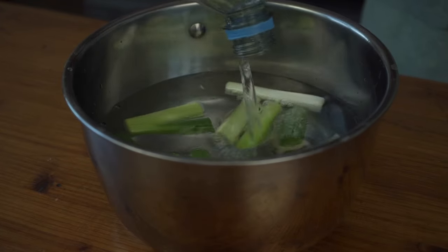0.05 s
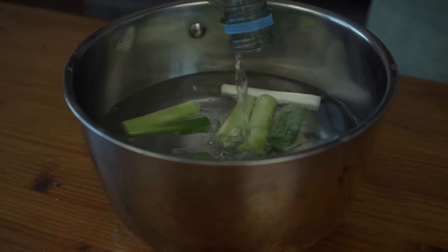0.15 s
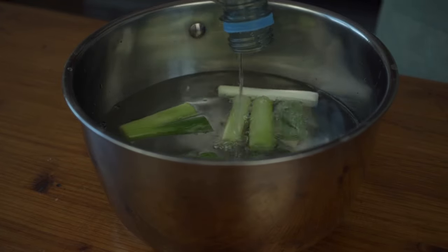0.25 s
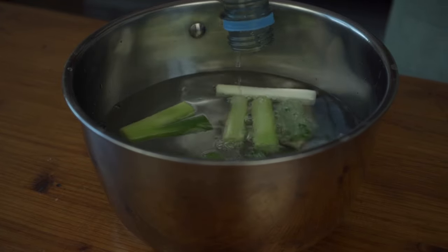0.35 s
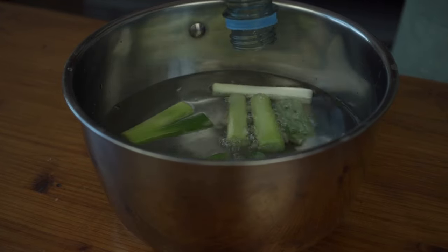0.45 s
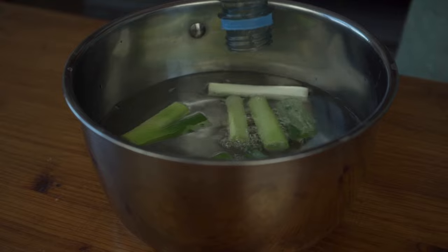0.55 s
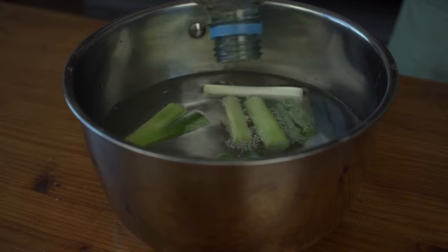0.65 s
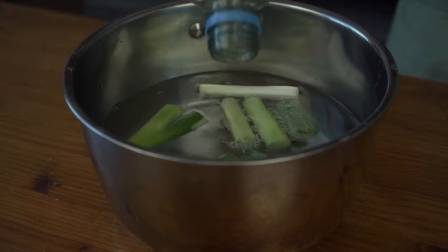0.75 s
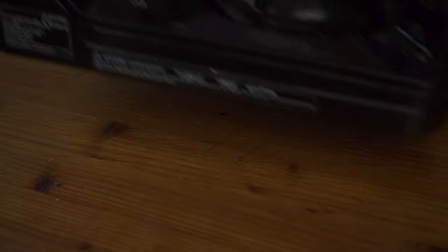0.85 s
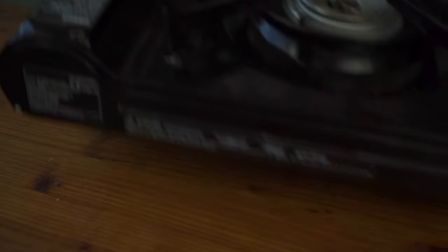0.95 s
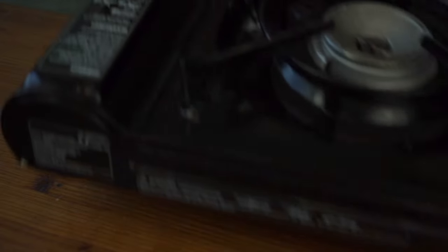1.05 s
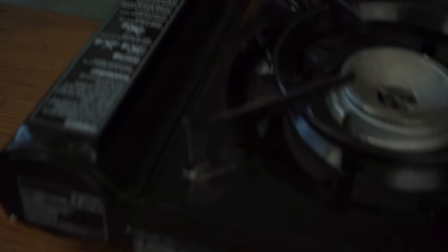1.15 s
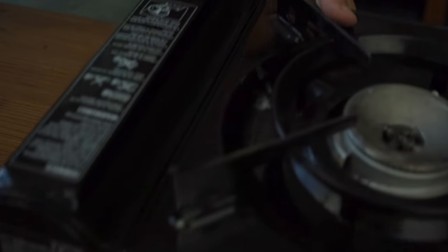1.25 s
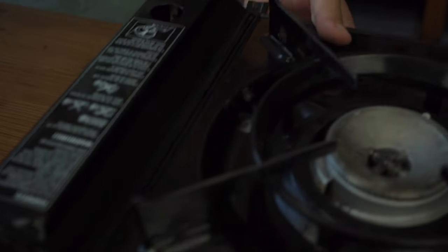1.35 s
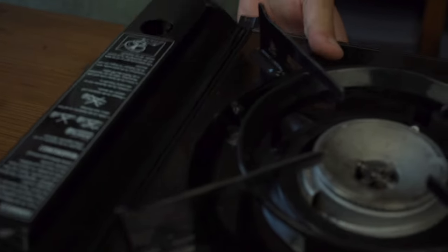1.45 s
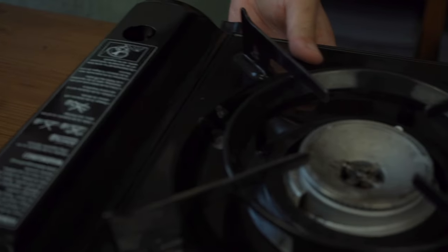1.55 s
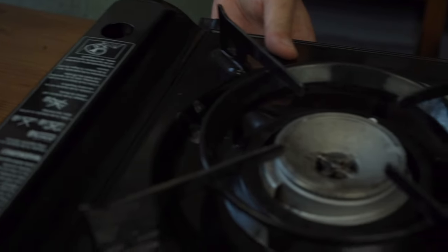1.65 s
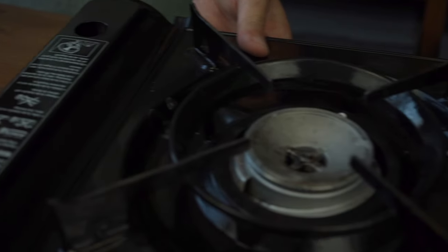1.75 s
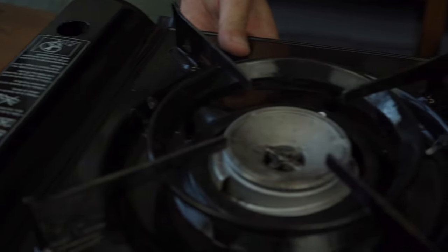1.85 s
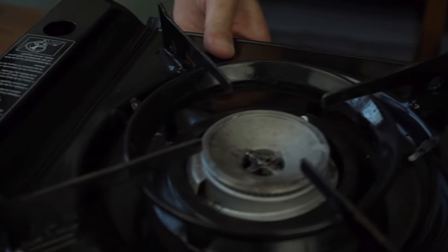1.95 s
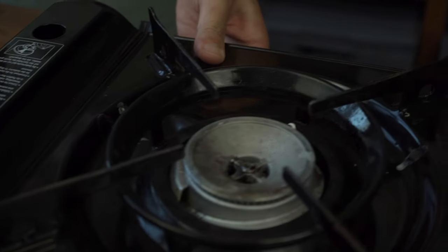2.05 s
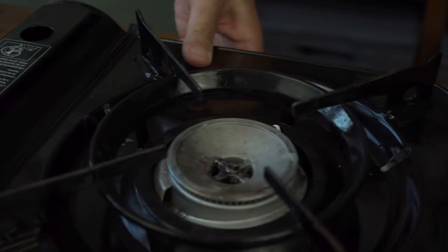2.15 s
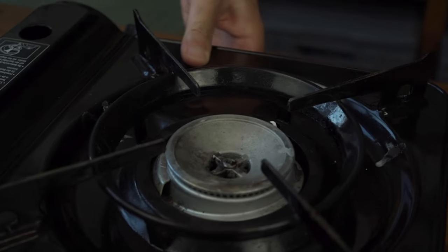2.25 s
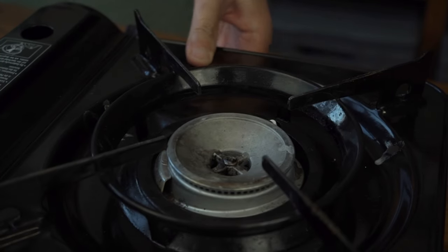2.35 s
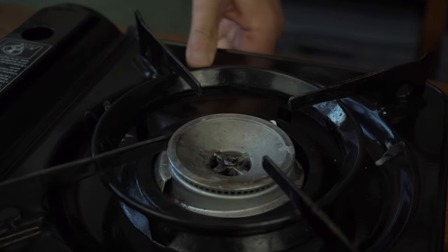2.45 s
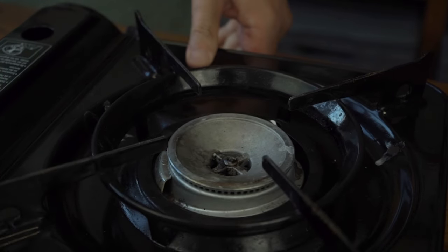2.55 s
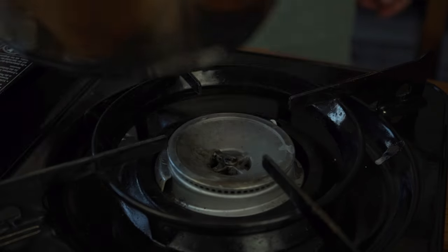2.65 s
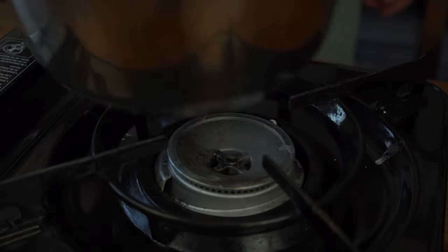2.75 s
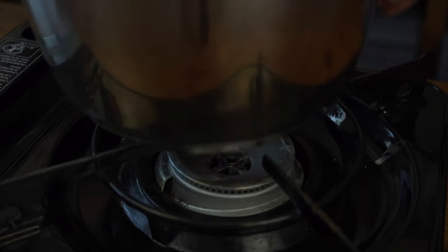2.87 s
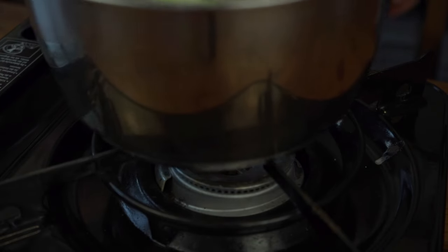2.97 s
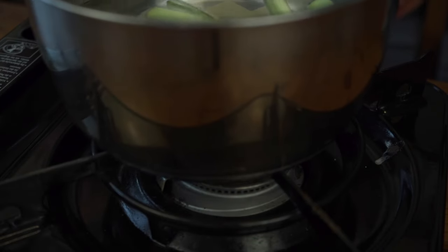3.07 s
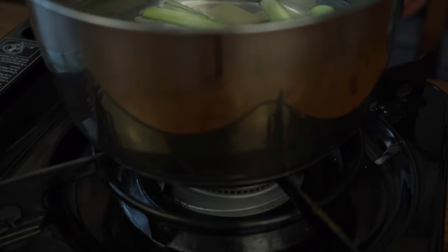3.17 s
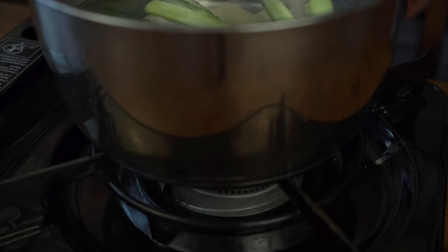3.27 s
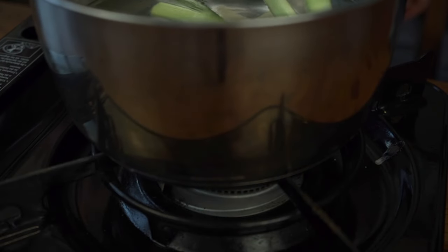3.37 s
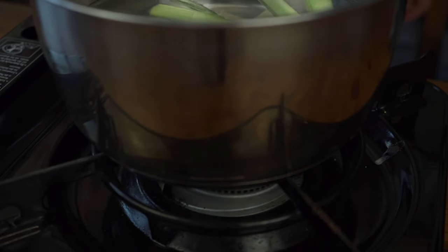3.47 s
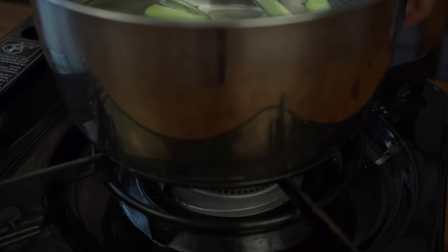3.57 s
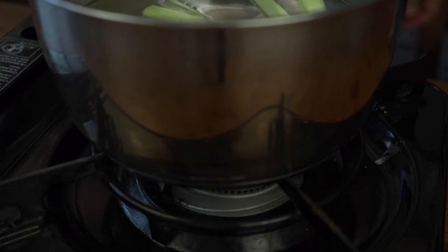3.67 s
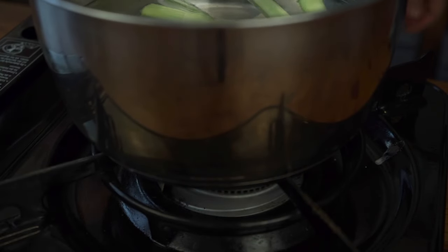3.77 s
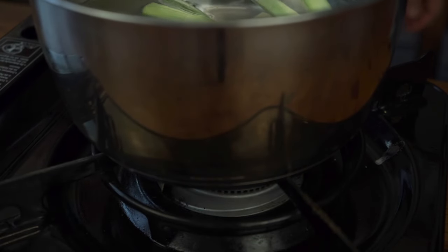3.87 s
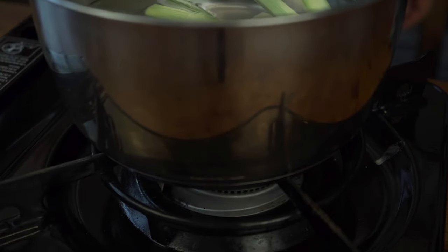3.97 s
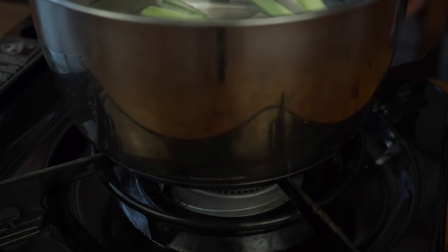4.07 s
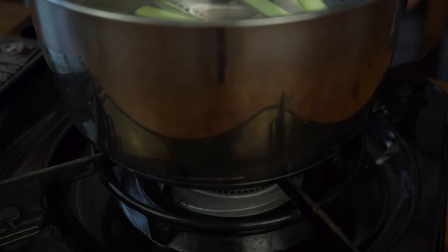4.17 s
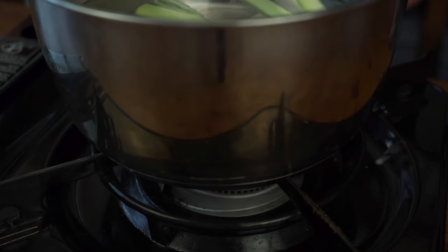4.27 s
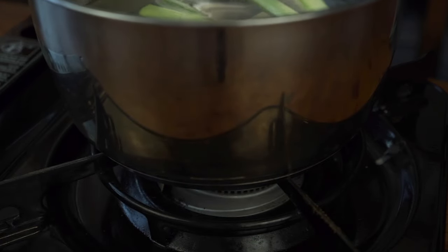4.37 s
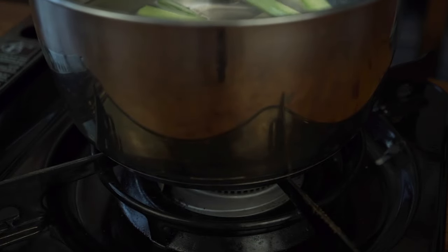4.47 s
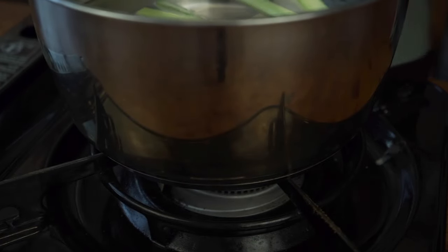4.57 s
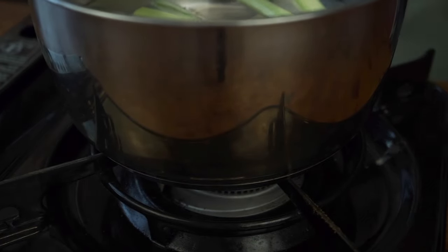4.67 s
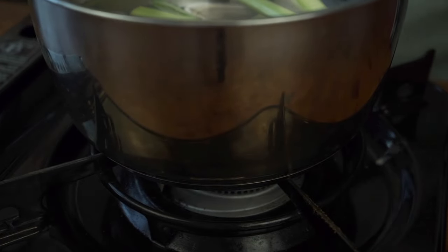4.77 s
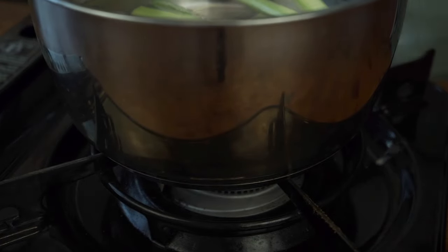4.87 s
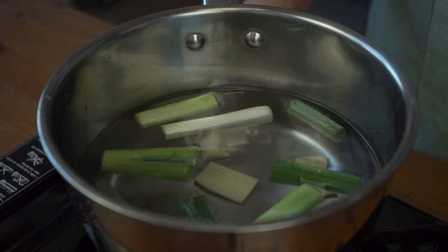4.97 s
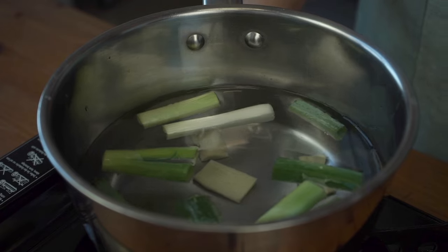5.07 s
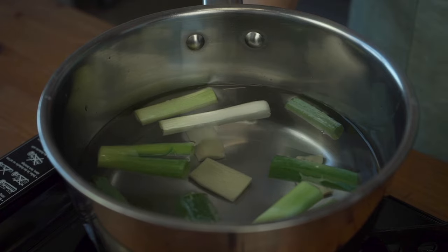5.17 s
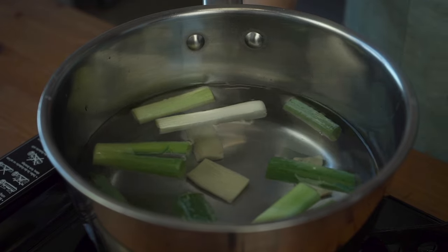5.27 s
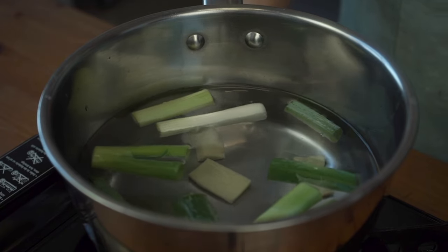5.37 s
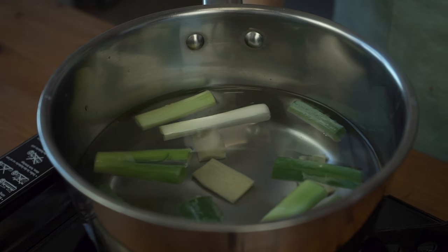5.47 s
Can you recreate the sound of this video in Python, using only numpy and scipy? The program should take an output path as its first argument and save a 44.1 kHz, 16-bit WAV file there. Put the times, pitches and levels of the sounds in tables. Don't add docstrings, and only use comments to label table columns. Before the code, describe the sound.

Last trickle of water plinks into a steel pot, a metal camp stove clatters down, the full pot lands and rocks, a lever snaps.

```python
import sys
import numpy as np
from scipy import signal
from scipy.fft import rfft, irfft, next_fast_len
from scipy.io import wavfile
from scipy.ndimage import map_coordinates

SR = 44100
rng = np.random.default_rng(int(sys.argv[2]) if len(sys.argv) > 2 else 0)


def field_ratio(decibels):
    return 10 ** (np.asarray(decibels, dtype=float) / 20)


def pcm_store(signal):
    levels = np.round(np.clip(np.atleast_2d(signal), -1, 1) * 32767)
    wavfile.write(sys.argv[1], SR, levels.astype(np.int16).T)


N = 243520

CUTS = (2.626, 4.928)
BANDS = (420, 1900, 3950, 9800)


def unit(x):
    return x / np.sqrt(np.mean(x ** 2) + 1e-20)


def along(points, hz):
    f, v = np.transpose(points)
    return np.interp(np.log(hz + 1), np.log(f + 1), v)


def gains(rows):
    s, *columns = np.transpose(rows)
    return [field_ratio(np.interp(np.arange(N) / SR, s, c, -150, -150)) for c in columns]


def wobble(rate, size=N):
    knots = rng.standard_normal(int(size * rate / SR) + 4)
    return map_coordinates(knots, [np.arange(size) * rate / SR])


def filtered(x, response):
    size = x.shape[-1]
    m = 2 * next_fast_len(size // 2 + SR // 4)
    return irfft(rfft(x, m) * response(np.fft.rfftfreq(m, 1 / SR)), m)[..., :size]


def coloured(x, spectrum):
    return unit(filtered(x, lambda hz: field_ratio(along(spectrum, hz))))


def peaks(rows):
    def response(f):
        return sum((-1) ** k * field_ratio(db) * 1j * f * width / (hz * hz - f * f + 1j * f * width)
                   for k, (hz, width, db) in enumerate(rows))
    return response


def causal(gain):
    cepstrum = irfft(np.log(gain + 1e-6))
    half = cepstrum.shape[-1] // 2
    folded = [cepstrum[..., :1], 2 * cepstrum[..., 1:half], 0 * cepstrum[..., half:]]
    return np.exp(rfft(np.concatenate(folded, -1)))


def rung(s, db, hz, t60, rise):
    out = np.zeros(N)
    t = np.arange(min(N - round(s * SR), round(2 * t60 * SR))) / SR
    envelope = field_ratio(db - 60 * t / t60) * (1 - np.exp(-t / rise))
    out[round(s * SR):][:len(t)] = envelope * np.sin(2 * np.pi * hz * t)
    return out


def bowl(splash):
    # frequency in Hz, width in Hz, level in dB.
    cavity = [(1050, 1100, -2.5), (1490, 760, -0.5), (2600, 87, -2.5), (4000, 1800, -9.5), (8460, 1260, -7),
              (13500, 1800, -19.5)]
    return filtered(splash, peaks(cavity))


def trickle():
    # time in seconds, flow level in dB.
    flow_levels = [(0.0, -55.5), (0.234, -56), (0.348, -59.5), (0.5, -101)]
    flow = gains(flow_levels)[0][:SR]
    out, t = np.zeros(N), np.arange(600) / SR
    for when, pitch, size in rng.random((420, 3)):
        hz, at = 1800 * 5.5 ** pitch, int(when * SR / 2)
        envelope = field_ratio(2.0 - 2.8 * np.log(1 - size) - 3.9 * hz * t) * (1 - np.exp(-hz * t))
        out[at:][:600] += flow[at] * envelope * np.sin(2 * np.pi * hz * t)
    out[:SR] += bowl(flow * field_ratio(-16.0 + 3.6 * wobble(153, size=SR)) * rng.standard_normal(SR))
    return out


def drops():
    # start in seconds, peak in dB, bubble pitch in Hz, t60 in seconds, splash in dB; drops,
    # gulps and spatters, loud and faint.
    plops = [(0.04, -27.5, 1860, 0.046, 2.5), (0.062, -43, 2100, 0.038, -14), (0.091, -41, 4450, 0.022, 5),
             (0.097, -25, 1355, 0.015, -3.5), (0.105, -40.5, 1130, 0.046, -1),
             (0.14, -20, 1010, 0.028, -12), (0.155, -27.5, 910, 0.019, -8.5),
             (0.193, -29, 2600, 0.038, -6.5), (0.248, -31.5, 3400, 0.019, -31),
             (0.256, -36, 3000, 0.016, -12), (0.261, -29.5, 3100, 0.016, -10.5),
             (0.278, -22.5, 2670, 0.021, -26), (0.289, -22.5, 3020, 0.017, -47),
             (0.303, -43, 2960, 0.02, -32), (0.321, -60, 2600, 0.03, -9), (0.334, -48, 2600, 0.021, 4),
             (0.344, -32, 2540, 0.033, -9), (0.375, -39.5, 3940, 0.033, -11),
             (0.748, -41.5, 800, 0.026, -7),
             (.240, -45, 5800, .03, -12), (.2795, -36, 950, .06, -30), (.291, -38, 1000, .04, -30),
             (.267, -47, 6000, .015, 3), (.444, -55, 13000, .01, -20)]
    fine = [(.032, -56, 4000, 0.012, -30), (0.041, -19, 7730, 0.02, -30), (.041, -42, 13100, .012, -30),
            (.063, -34, 8000, .015, -20), (.074, -46, 7500, .012, -12), (.089, -46, 12500, .01, -30),
            (.091, -34, 10300, .01, -30), (.107, -44, 4000, .012, -10), (.115, -48, 9100, .015, -30),
            (.141, -41, 8000, .015, -30), (.154, -42, 7950, .015, -30), (0.256, -45, 13000, 0.0055, -11),
            (.267, -47, 13500, .006, -18), (.283, -43, 13000, .006, -12), (.283, -42, 5700, 0.017, -30),
            (.305, -42, 2860, .02, -30), (.323, -53, 2930, 0.023, -30), (.335, -54, 13000, .008, -8),
            (.369, -55, 3900, .03, -20), (.378, -45, 5550, 0.016, -15)]
    bubbles, splashes, t = np.zeros(N), np.zeros(SR), np.arange(SR // 12) / SR
    for s, db, hz, t60, splash_db in plops + fine:
        at = round(s * SR)
        pitch = hz * (1 + 1.7 * t) * field_ratio(0.46 * wobble(560, size=len(t)))
        envelope = field_ratio(-60 * t / max(t60, .005)) * (1 - np.exp(-t / 0.00013))
        bubble = np.sin(2 * np.pi * np.cumsum(pitch) / SR) * envelope
        bubbles[at:][:len(t)] += field_ratio(db - 6.0) * bubble
        splash = field_ratio(db + splash_db + 5.0 - 60 * t / 0.024) * rng.standard_normal(len(t))
        splashes[at:][:len(t)] += splash
    bubbles[:SR] += bowl(splashes)
    return bubbles


def room(x):
    # frequency in Hz, t60 in seconds.
    decay = [(100, 0.92), (400, 0.42), (1500, 0.41), (5000, 0.27), (9000, 0.25), (14000, 0.034)]
    hz, t, z = signal.stft(rng.standard_normal(SR // 2), SR, nperseg=256)
    tail = signal.istft(z * field_ratio(-60 * t / along(decay, hz)[:, None]), SR, nperseg=256)[1]
    delayed = np.pad(x, (260, 0))
    return signal.fftconvolve(delayed, tail / np.linalg.norm(tail))[:N]


def room_tone():
    # frequency in Hz, level in dB per Hz.
    spectrum = [(26, -37.5), (45, 1), (85, 1.5), (104, -17.5), (158, -3.5), (197, -4.5), (264, 2.5),
                (321, -4.5), (411, -2), (624, -6.5), (760, -5.5), (2410, -15), (2660, -19), (4500, -22),
                (5400, -16), (6300, -24.5), (8660, -26), (16000, -42.5)]
    return field_ratio(-61 + 0.43 * wobble(2.6)) * coloured(rng.standard_normal(N), spectrum)


def jolted(column, rise, t60):
    # start in seconds, sway in dB, top drone in dB; hands holding the table.
    held = [(0, -74, -71), (.85, -61, -66), (1.502, -57.5, -60), (2.625, -75, -73), (3.149, -61.5, -63.5),
            (4.927, -57.5, -69)]
    # time in seconds, sway in dB, top drone in dB; jolts to the table.
    jolts = [(.03, -47.5, -49), (1.081, -53, -83), (1.249, -33, -31.5), (1.436, -17.5, -40),
             (2.049, -36.5, -54), (2.36, -40, -59), (2.48, -28.5, -63), (3.146, -33, -61),
             (3.4, -35.5, -51), (3.72, -48, -41.5), (3.931, -43, -56), (4.183, -41.5, -47),
             (4.443, -47, -63), (4.7, -45, -47), (4.931, -67.5, -71), (5.1, -51, -67), (5.22, -37, -57),
             (5.36, -31.5, -35.5), (5.42, -51, -45)]
    t = np.arange(0, N / SR, .002)
    starts = np.transpose(held)[0]
    power = field_ratio(2 * np.transpose(held)[column])[np.searchsorted(starts, t, "right") - 1]
    for row in jolts:
        u = np.maximum(t - row[0], 0)
        end = min(s for s in (*CUTS, N) if s > row[0])
        swell = np.minimum(u / rise, 1) * (t < end)
        power = power + (field_ratio(row[column] - 60 * u / t60) * swell) ** 2
    return np.interp(np.arange(N) / SR, t, np.sqrt(power))


def table():
    sway_gain = jolted(column=1, rise=0.042, t60=1.04)
    drone_gain = jolted(column=2, rise=0.014, t60=0.31)
    sway = np.sin(2 * np.pi * np.cumsum(32.5 + 1.5 * wobble(8)) / SR)
    loose = coloured(rng.standard_normal(N),
                     [(12, -22.5), (22, -22.5), (42, -5.0), (55, -4.5), (80, -68.0), (200, -130)])
    drone = coloured(rng.standard_normal(N),
                     [(45, -25.5), (80, -7.5), (124, 5.0), (250, -4.5), (350, -23.5), (600, -100)])
    drone = field_ratio(4.5 * wobble(14)) * drone
    return sway_gain * (1.4 * field_ratio(1.4 * wobble(15.0)) * sway + 0.48 * loose) + field_ratio(0.5) * drone_gain * drone


def stroke(s, length, db):
    t = np.arange(N) / SR - s
    return field_ratio(db + 125.5 * np.minimum(t, 0) - 251 * np.maximum(t - length, 0))


def hands():
    # start in seconds, length in seconds, level in dB.
    rubs = [(0.566, 0.32, -64.5), (1.92, 0.41, -67), (3.575, 0.057, -66.5), (4.14, 0.18, -61.5),
            (4.636, 0.015, -64.5), (4.846, 0.078, -63.5)]
    # frequency in Hz, level in dB per Hz.
    spectrum = [(880, -22), (1500, -3.5), (1640, -27.5), (2140, -8.5), (2320, -8.5), (3730, -13.5),
                (8660, -15), (16000, -35)]
    grain = field_ratio(2.1 * wobble(49)) * rng.standard_normal(N)
    return sum(stroke(*row) for row in rubs) * coloured(grain, spectrum)


def shoves():
    # start in seconds, level in dB, frequency in Hz, t60 in seconds.
    rolls = [(1.07, -38, 18, .9), (2.33, -36, 17, .8), (2.47, -33, 17, .4)]
    return sum(rung(*row, rise=.04) for row in rolls)


def chatter(contacts, rise, gritty_db, clack_share, blow=0.0):
    force, t = np.zeros((len(BANDS) + 1, N + SR)), np.arange(SR // 4) / SR
    top = np.c_[np.arange(len(force)) == len(BANDS)]
    sheen = 60 * t / 0.27 * top
    for s, db, t60, weight_db, hard_db in contacts:
        steps = np.repeat(rng.standard_normal(len(t) // 21 + 1), 21)[:len(t)]
        envelope = field_ratio(-60 * t / max(t60, .008)) * (1 - np.exp(-t / rise))
        run = field_ratio(gritty_db * steps) * rng.standard_normal(len(t)) * envelope
        run[4] += blow
        band_db = np.c_[[weight_db, 0, clack_share * hard_db, hard_db, hard_db + 2.5]]
        force[:, round(s * SR):][:, :len(t)] += field_ratio(db + band_db - sheen) * run
    return force[:, :N]


def sliding(s, hold, db, clack_db, edge_db, fade):
    press, = gains([(s, db), (s + hold, db), (s + .2, db - fade * (.2 - hold))])
    band_gain = field_ratio(np.c_[[-14, 0, clack_db, edge_db, edge_db]])
    return press * field_ratio(2.4 * wobble(90)) * rng.standard_normal(N) * band_gain


def struck(force, modes, skin, level_db, ring_db, trim_db):
    busy = np.flatnonzero(force[1])
    part = slice(busy[0], busy[-1] + SR // 2)

    def split(f):
        below = [0 * f] + [1 / (1 + (f / hz) ** 14) for hz in BANDS] + [1 + 0 * f]
        return causal(np.sqrt(np.diff(below, axis=0)))

    trim = field_ratio(np.c_[trim_db + trim_db[-1:]])
    push = filtered(force[:, part] * trim, split).sum(0)
    ring = peaks([(hz, 6 / t60, db + 20 * np.log10(t60 * 80)) for hz, db, t60 in modes])
    out = np.zeros(N)
    body = filtered(push, lambda f: causal(field_ratio(along(skin, f))) + field_ratio(ring_db) * ring(f))
    out[part] = field_ratio(level_db) * body
    return out


def stove():
    # start in seconds, peak in dB, chatter t60 in seconds, weight in dB, hardness in dB.
    hits = [(1.251, -11.5, 0.055, -12, 1.5), (1.436, -4, 0.075, -3, -25.5), (1.777, -38, 0.21, -11.5, -65),
            (2.009, -31, 0.074, -2, -17.5), (2.203, -38.5, 0.057, -12, -48),
            (2.28, -32.5, 0.063, -2.5, -45), (2.478, -20.5, 0.057, 3, -2), (2.497, -16, 0.048, 2, -21)]
    bumps = [(1.292, -25, 0.065, -20, -3), (1.298, -24.5, 0.074, -15.5, 1.5), (1.33, -22.5, 0.13, -10, -4),
             (1.348, -31.5, 0.06, -15, 5), (1.364, -23, 0.059, -10.5, -5), (1.384, -23, 0.034, -1, -4.5),
             (1.426, -20, 0.037, -8.5, -32), (1.444, -9.5, 0.07, -28, -6.5),
             (1.455, -13.5, 0.2, -6.5, -20.5), (1.458, -18, 0.044, -16.5, -1.5),
             (1.593, -30, 0.15, -12, -17), (1.838, -50, 0.056, -20, -9), (2.255, -44, 0.1, -8, -27),
             (2.296, -40, 0.039, -9, -36), (2.488, -17.5, 0.033, -34, -21), (2.51, -32.5, 0.095, -1, -9),
             (1.465, -33.5, 0.39, -29, 1), (1.892, -47, 0.072, -12, -30), (1.943, -45, 0.07, -13, -26),
             (2.037, -43, .12, -2, -40), (2.075, -42, 0.13, -3, -40), (2.12, -50, 0.085, -4, -42),
             (1.66, -45.5, .2, -15, -33), (1.72, -44, 0.13, -13, -36)]
    # hold in seconds, level in dB, clack in dB, edge in dB, fade in dB a second.
    scrape = (-0.03, -40.5, -3, 4.5, 700)
    # frequency in Hz, level in dB, t60 in seconds; the stove body.
    modes = [(120, -25, 0.32), (201.4, -6, 0.1), (290, -11, 0.08), (591, 0.5, 0.17), (940, -6, 0.13),
             (1068, -7, 0.24), (1290, -15, 0.25), (1860, 4, 0.092), (2240, -32.5, 0.083), (3200, -11, 0.04),
             (3420, -20.5, 0.044), (6930, -31, 0.082)]
    bars = [(2670, -16.5, .2), (3310, -12, 0.25), (4556, -12.5, .2), (4900, -15.5, .15), (6013, -15, .1),
            (6700, -9, 0.091), (7370, -7.5, .1), (9000, -12.5, 0.07), (12700, -25, .08)]
    # frequency in Hz, level in dB per Hz; bare contact noise.
    skin = [(53, -24), (90, -1), (300, -7), (593, -3.5), (769, -7.5), (1090, 1), (1570, -10.5), (1870, -6),
            (8530, -13.5), (16000, -32.5)]
    force = chatter(hits, 0.00068, gritty_db=1.5, clack_share=0.4, blow=2.7)
    force += chatter(bumps, 0.0013, gritty_db=-3.0, clack_share=0.4)
    force += sliding(1.262, *scrape)
    return struck(force, modes + bars, skin, level_db=7, ring_db=-18.5, trim_db=[12.0, 0, 3.0, 2.5])


def loose_parts():
    # start in seconds, peak in dB, frequency in Hz, t60 in seconds
    pings = [(2.203, -40.5, 1145, 0.11), (2.281, -40, 702.5, 0.15), (2.28, -43, 1660, 0.05),
             (2.487, -23, 1800, 0.031), (2.499, -34, 1210, 0.083),
             (1.259, -29, 6700, .03), (1.277, -33, 960, 0.045), (1.299, -23.5, 992, 0.065),
              (1.332, -29, 5000, 0.056), (1.346, -25.5, 996, 0.047), (1.367, -25.5, 1880, 0.036),
              (1.709, -47.5, 1342, 0.17), (1.777, -41, 1130, 0.13), (1.835, -44, 560, 0.065),
              (1.972, -48, 596, .1), (2.037, -41, 663, 0.074)]
    return sum(rung(*row, rise=0.0013) for row in pings)


def knocks():
    # start in seconds, peak in dB, frequency in Hz, t60 in seconds.
    cores = [
        (1.4362, -7.5, 560, 0.026),
        (3.147, -15, 1703, 0.053),
        (3.4105, -13.5, 982, 0.053),
        (5.306, -34, 580, .05),
        (5.3245, -7, 643, 0.022),
        (5.325, -25.5, 8300, .05),
        (5.338, -11.5, 1262, 0.065),
    ]
    return sum(rung(*row, rise=0.0011) for row in cores)


def rattle():
    # time in seconds, level in dB.
    levels = [(1.5, -32), (1.554, -43.5), (1.816, -54), (2.106, -53.5), (2.47, -66)]
    # frequency in Hz, width in Hz, level in dB.
    grate = [(580, 300, -11.5), (1130, 52, -2), (1360, 9.7, -3), (1810, 86, -13), (2080, 78, -19.5),
             (2480, 640, -19.5)]
    buzz = field_ratio(2.5 * wobble(18) + 3 * wobble(150)) * rng.standard_normal(N)
    ringing = unit(filtered(buzz, lambda f: peaks(grate)(f) / (1 + (f / 6000) ** 4)))
    bare = coloured(buzz, [(200, -36), (450, -7.0), (1200, -12.0), (3000, -12.0), (8000, -27), (12000, -70)])
    return gains(levels)[0] * field_ratio(-3.0) * (ringing + 0.34 * bare)


def landing_pot():
    # start in seconds, peak in dB, chatter t60 in seconds, weight in dB, hardness in dB.
    hits = [
        (3.146, -10.5, 0.061, -26.5, -30),
        (3.364, -10.5, 0.03, -29, -6.5),
        (3.4095, -11, 0.038, -31.5, -13.5),
    ]
    bumps = [(3.158, -22.5, 0.039, -17, -23), (3.22, -18.5, 0.047, -22, -53),
             (3.237, -22.5, 0.064, -20, -43.5), (3.25, -52.5, 0.18, -23, -7.5),
             (3.372, -17.5, 0.091, -29.5, -10), (3.401, -11, 0.035, -28, -18),
             (3.415, -17, 0.032, -26, -17), (3.423, -21, 0.033, -19, -16), (3.43, -44, .3, -21, -9)]
    # frequency in Hz, level in dB, t60 in seconds.
    modes = [(123.8, -24, 0.92), (492, -15, 0.64), (551, -5, 0.09), (950, -23.5, 0.2), (1011, -12, 0.69),
             (1223, -9.5, 0.52), (1663, -4, 0.082), (1750, 4, 0.036), (2110, -7, 0.054), (2680, -6.5, 0.05),
             (3100, -10, 0.16), (3375, -11.5, 0.09), (3900, -0.5, 0.13), (8600, -11, 0.022)]
    # frequency in Hz, level in dB per Hz; bare contact noise.
    skin = [(53, -5.5), (90, 15), (400, 3), (956, 1.5), (1510, 0.5), (1680, -5), (1910, -3.5), (3900, -4.5),
            (4350, -15.5), (8170, -24.5), (16000, -47)]
    force = chatter(hits, 0.0001, gritty_db=2.0, clack_share=0.17, blow=2.9)
    force += chatter(bumps, .0006, gritty_db=2.0, clack_share=0.47)
    return struck(force, modes, skin, level_db=5.5, ring_db=-18.0, trim_db=[15.0, -2.0, 4.0, 16.0])


def rocking_pot():
    # start in seconds, peak in dB.
    taps = [(3.718, -27.5), (3.756, -27.5), (3.932, -20.5), (3.982, -26.5), (4.018, -29), (4.043, -43),
            (4.183, -23), (4.234, -31), (4.278, -36), (4.443, -21.5), (4.5, -26.5), (4.543, -37.5),
            (4.574, -40), (4.699, -23), (4.758, -30)]
    # frequency in Hz, level in dB, t60 in seconds; the seated pot.
    modes = [(163, -4.5, 0.62), (296, -20, 0.22), (445, -8.5, 0.16), (572, 5.5, 0.11), (663, 0, 0.13),
             (853.4, -12, 0.6), (1081, -14, 0.22), (1238, -12, 0.37), (1660, -4, 0.11), (2180, -15, 0.17),
             (2290, -3, 0.068), (2620, -5.5, 0.046), (3350, 2, 0.088), (3930, -37, 0.028)]
    # frequency in Hz, level in dB per Hz; bare contact noise.
    skin = [(53, -11.5), (90, 14.5), (400, 2), (600, 3.5), (956, 3.5), (1910, 1), (3900, -5), (4350, -20),
            (16000, -47.5)]
    contacts = [(s, db, 0.063, -25, 12 + 1.805 * db) for s, db in taps]
    force = chatter(contacts, 0.00034, gritty_db=2.0, clack_share=0.32, blow=6.8)
    return struck(force, modes, skin, level_db=2.0, ring_db=-11.0, trim_db=[16.0, -1.5, 5.0, 18.0])


def lever():
    # start in seconds, peak in dB, chatter t60 in seconds, weight in dB, hardness in dB.
    hits = [(5.094, -20.5, 0.048, -17.5, -20.5), (5.116, -21, 0.065, -18.5, -11),
            (5.208, -26, 0.13, -39, -22), (5.221, -17.5, 0.057, -13.5, -28)]
    bumps = [(5.0905, -19.5, 0.044, -27, -12), (5.206, -13.5, 0.041, -11.5, -24.5),
             (5.214, -17, 0.053, -28, -27), (5.232, -18, 0.048, -9.5, -28), (5.304, -35.5, 0.059, -20, -26),
             (5.322, -14, 0.016, -12, -23), (5.15, -49, 0.34, -20, -10.5), (5.25, -50, .3, -20, -15)]
    # frequency in Hz, level in dB, t60 in seconds.
    modes = [(210, -10, 0.14), (551, -10.5, 0.29), (595, 2, 0.08), (954, -37, .1), (1356, -10, 0.08),
             (3900, -9, 0.031), (12300, -10.5, 0.014)]
    # frequency in Hz, level in dB per Hz; bare contact noise.
    skin = [(53, -31), (90, -20), (581, -0.5), (1110, -4), (1240, -6.5), (2590, -3.5), (3660, -2.5),
            (6300, -8), (8910, -11.5), (16000, -24)]
    force = chatter(hits, 0.00067, gritty_db=2.5, clack_share=0.53)
    force += chatter(bumps, 0.0037, gritty_db=-2.0, clack_share=0.55)
    return struck(force, modes, skin, level_db=8.0, ring_db=-11.5, trim_db=[19.3, 1.4, 2.2, 11.1])


def snap():
    # start in seconds, peak in dB, chatter t60 in seconds, weight in dB, hardness in dB.
    hits = [(5.325, -5, 0.036, -18.5, -13), (5.332, -16, 0.089, -14, -0.5), (5.336, -8, 0.027, -21, -7.5),
            (5.339, -4, 0.033, -16.5, -2), (5.377, -21, 0.1, -17, -10), (5.35, -20, 0.097, -13, -1),
            (5.362, -19.5, 0.085, -15, -2), (5.405, -28.5, .12, -19, -7), (5.455, -39, 0.27, -9, -4)]
    # hold in seconds, level in dB, clack in dB, edge in dB, fade in dB a second.
    buzz = (0.08, -27, -2, -3, 181)
    # frequency in Hz, level in dB, t60 in seconds; the latched lever.
    modes = [(204, -18, 0.037), (397, -7.5, 0.91), (610, -32, 0.06), (1010, -35, .08), (1224, 5.5, 0.087),
             (2320, -14, 0.18), (3000, 1.5, 0.11), (3660, -31, 0.1), (3540, 9.5, 0.062), (4270, -32, .15),
             (4200, -15, 0.23), (8600, -20, .04)]
    shell = [(1346, -18, 0.3), (1660, -10, .3), (1950, -24, 0.24), (2220, -6, 0.4), (2930, -8, 0.3),
             (3270, 0, 0.36), (4040, -9, 0.22), (4350, -3, 0.12), (4870, -14, .3), (5290, -16, .2),
             (6140, -21, .3), (6440, -17, .3), (7000, -17, .2), (8300, -14, 0.17)]
    # frequency in Hz, level in dB per Hz; bare contact noise.
    skin = [(90, -18), (581, 0.5), (1240, -3.5), (3700, -2.5), (5200, -8.5), (8900, -12.5), (11000, -19),
            (16000, -28)]
    force = chatter(hits, 0.0011, gritty_db=3.5, clack_share=0.93) + sliding(5.33, *buzz)
    return struck(force, modes + shell, skin, level_db=2.0, ring_db=-21.0, trim_db=[23.9, 1.4, 2.2, 3.4])


def spring():
    # frequency in Hz, level in dB, t60 in seconds.
    tones = [(9076, -16.5, .15), (13120, -34, .22), (15350, -31, .1)]
    t = np.maximum(np.arange(N) / SR - 5.353, 0)
    beat = np.sin(np.pi * 13.5 * t) + .08 * (1 - np.exp(-t / .01))
    out = np.zeros(N)
    for hz, db, t60 in tones:
        tone = np.sin(2 * np.pi * hz * t + .6 * wobble(150))
        out += field_ratio(db - 60 * t / t60 + 2.5 * wobble(120)) * beat * tone
    return out


def heave():
    # start in seconds, level in dB, frequency in Hz, t60 in seconds.
    roll = (5.42, -19, 14, .6)
    return rung(*roll, rise=.012)


def before(s):
    return np.clip((s - np.arange(N) / SR) / .002, 0, 1)


def scene():
    first = trickle() + drops() + shoves() + stove() + loose_parts() + rattle()
    first = (first + field_ratio(-14.0) * room(first)) * before(CUTS[0])
    second = landing_pot() + rocking_pot()
    second = (second + field_ratio(-14.5) * room(second)) * before(CUTS[1])
    last = lever() + snap() + spring()
    last = last + field_ratio(-13.5) * room(last)
    close = knocks() + table() + heave() + hands() + room_tone()
    return (first + second + last + close)[None]


def roll_off(x):
    return signal.sosfilt(signal.butter(12, 16850, fs=SR, output="sos"), x)


def record(dry):
    # frequency in Hz, level in dB.
    capsule = [(6000, 0), (8700, 0), (9500, 0), (10400, -3), (13300, 4.5), (15600, 1)]
    x = dry / (1 + np.abs(dry / .57) ** 8) ** (1 / 8)
    x = filtered(x, lambda hz: 1 / (1 + (hz / 15900) ** 60))
    x = filtered(x, lambda hz: field_ratio(along(capsule, hz)))
    return roll_off(x)


dry = scene()
out = record(dry)
pcm_store(out)
```